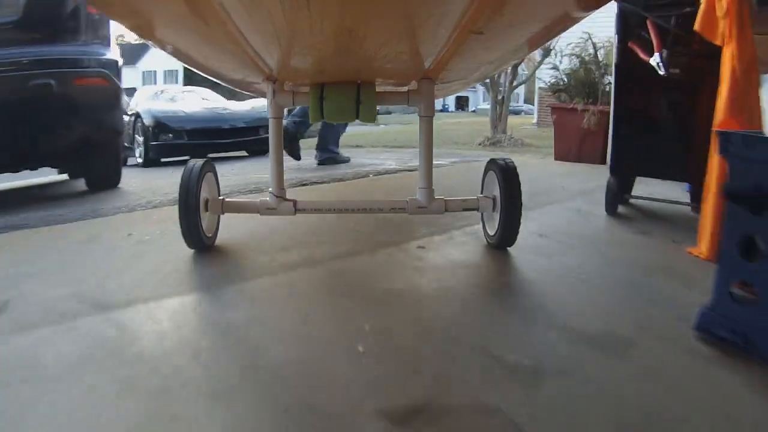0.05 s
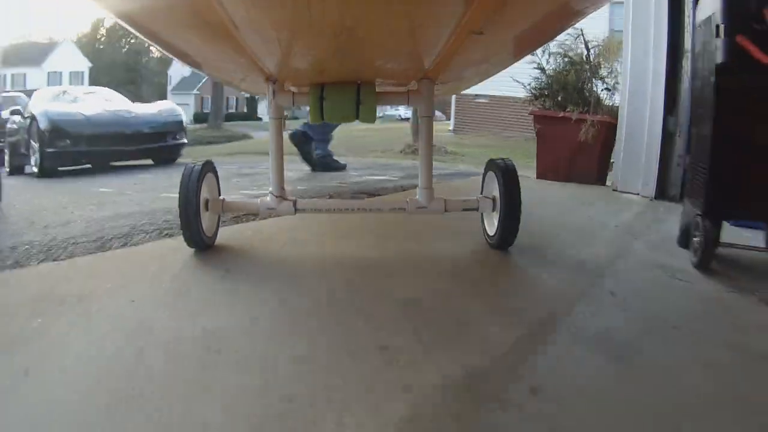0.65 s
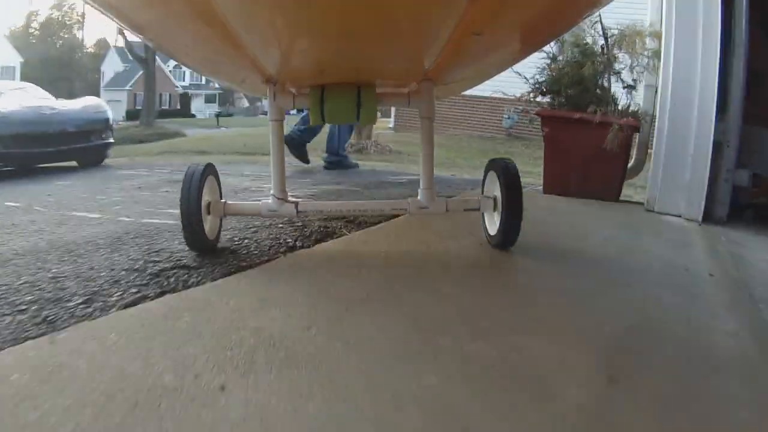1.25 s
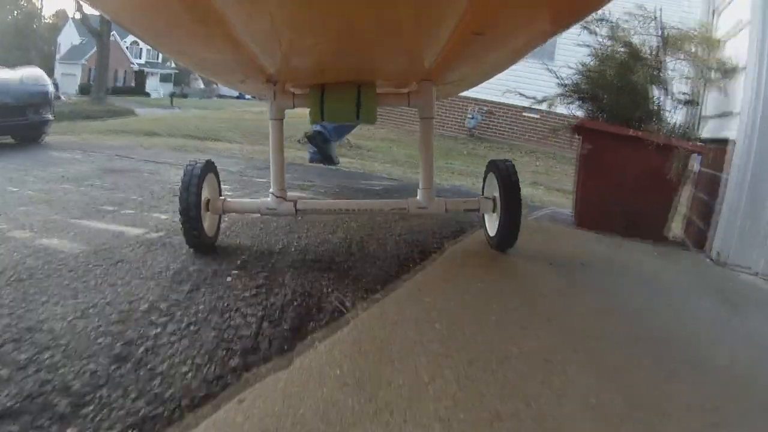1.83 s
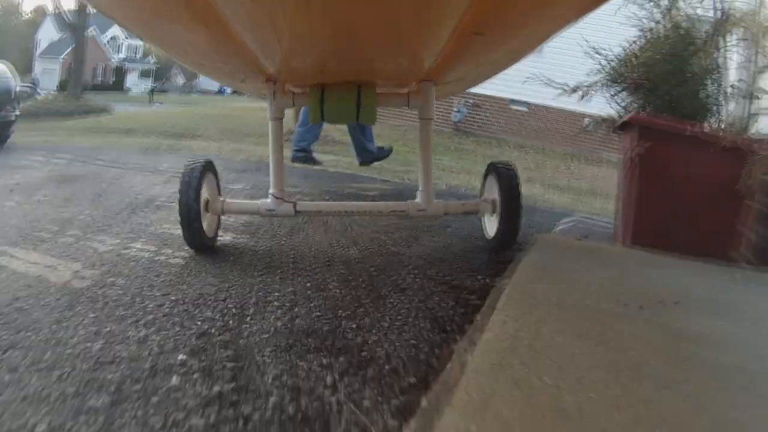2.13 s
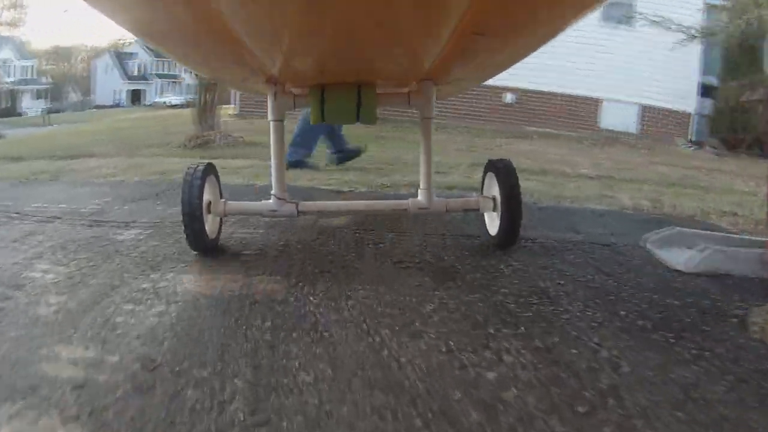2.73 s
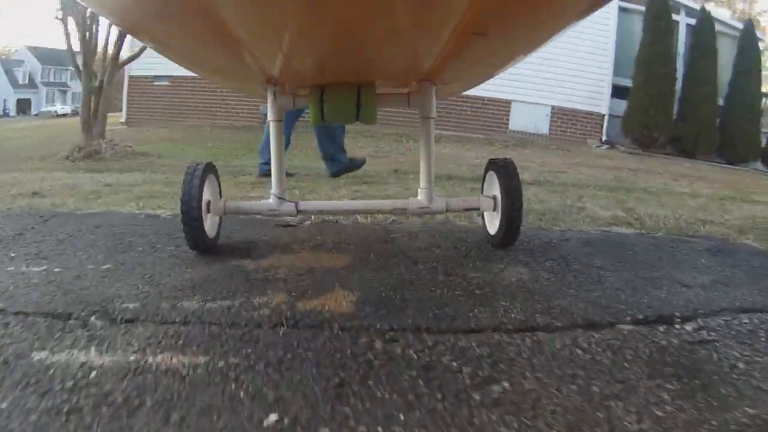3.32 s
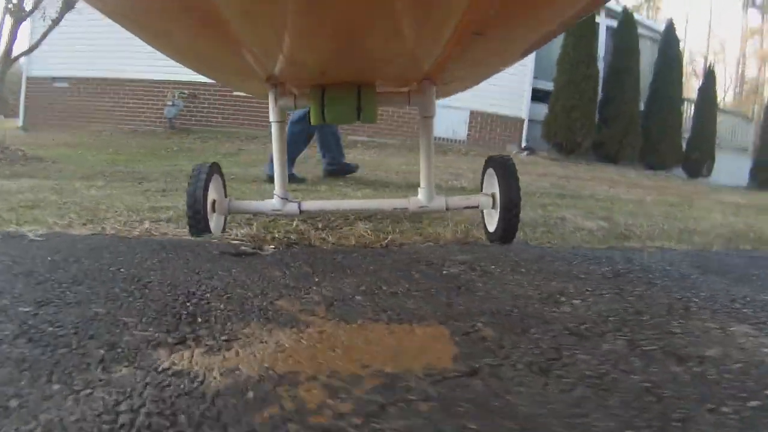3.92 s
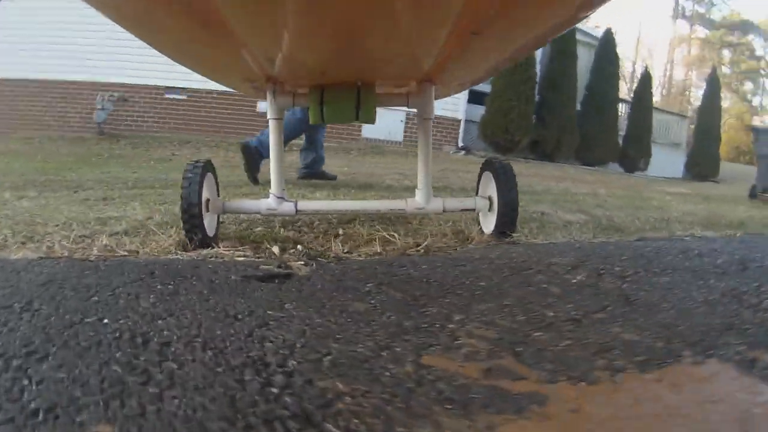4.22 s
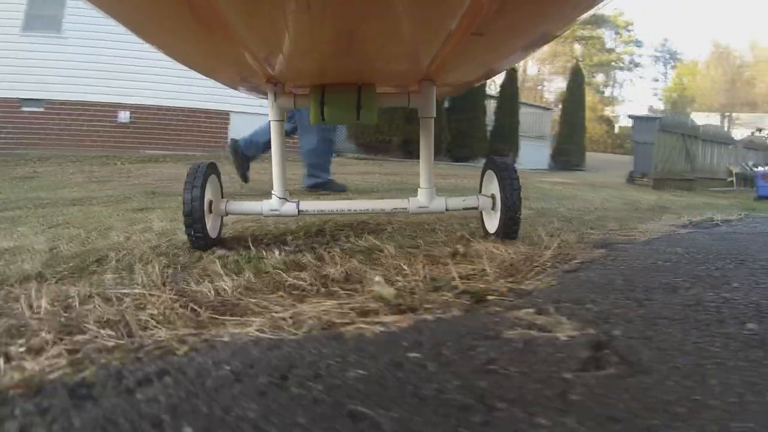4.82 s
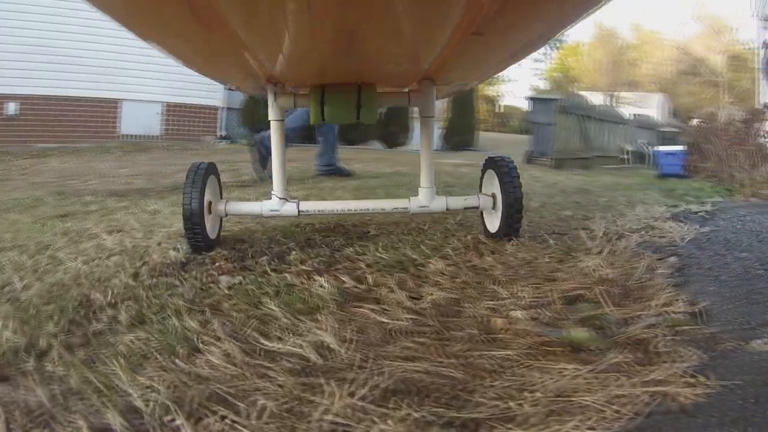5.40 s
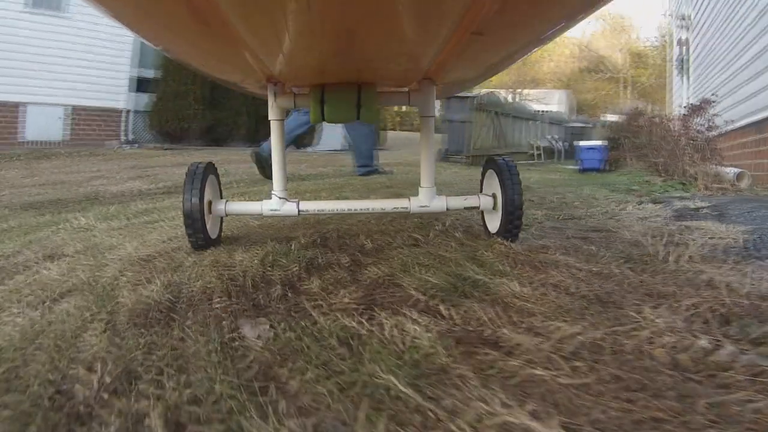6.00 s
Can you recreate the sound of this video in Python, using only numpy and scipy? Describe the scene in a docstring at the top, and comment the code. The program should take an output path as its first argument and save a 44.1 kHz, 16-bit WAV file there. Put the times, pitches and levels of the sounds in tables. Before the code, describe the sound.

A boat hull rides on a pipe cart with hard plastic wheels, heard from directly underneath. Over concrete and asphalt the hollow hull rumbles and booms, grit grinds, and loose hubs clack unevenly. Bumps bring knocks and sharp metal snaps, with the hardest jolts coming about two thirds of the way through. Then the wheels reach grass and the clatter dies into a soft rustle.

```python
"""A boat pulled on a cart

A hollow hull on a pipe-frame cart with hard plastic wheels rolls out of a garage, over asphalt and
onto grass. The ground shakes the hull into a rumble that leaps at each bump. Loose hubs tick and
rebound, the hull knocks, and the worst jolts snap a metal fitting. The microphone rides under the
hull, so the hardest blows overload it. On the grass the rattle dies into a soft rustle."""
import sys
import numpy as np
from scipy import signal
from scipy.fft import rfft, irfft
from scipy.io import wavfile
from scipy.ndimage import uniform_filter1d

SR = 44100
rng = np.random.default_rng(int(sys.argv[2]) if len(sys.argv) > 2 else 0)


def wrap_up_sound(samples):
    """Save the sound to the file named by the first command line argument, as 16-bit audio."""
    columns = np.atleast_2d(samples).T
    # keep every value between -1 and 1, then stretch to whole-number steps
    tamed = np.clip(columns, -1, 1)
    steps = np.round(tamed * 32767).astype(np.int16)
    wavfile.write(sys.argv[1], SR, steps)


N = 271215
BLOW_SIZE = 8192  # samples in one short sound
TIME, AGE = np.arange(N) / SR, np.arange(BLOW_SIZE) / SR  # seconds into the scene, into a short sound
FREQS, BLOW_FREQS = np.fft.rfftfreq(N, 1 / SR), np.fft.rfftfreq(BLOW_SIZE, 1 / SR)


# the cart bouncing on its wheels, and the hull's lowest note: (pitch [Hz], half-width [Hz], level [dB])
CART_BOUNCE = [(35.93, 6.3, -8.5), (23.8, 4.6, -16)]
HULL_DRONE = [(70.2, 7.2, 0)]
# the hull's deep boom and higher drumming; a colour says how strong each pitch is:
# (frequency [Hz], level [dB])
BOOM_COLOUR = [(80, -19.5), (100, 3.5), (120, 6.5), (148, 3), (175, 0.5), (200, -7), (250, -26.5),
               (400, -61), (800, -83.5)]
DRUM_COLOUR = [(120, -21.5), (200, -2.5), (245, 12), (330, 7), (480, 2), (650, -10), (850, -9.5),
               (2000, -69)]

def rumble():
    """The ground bounces the cart and makes the hollow hull drone, boom and drum."""
    uneven, coarse = terrain()
    bounce_db = ride(uneven, -22, follow=0.31, grass_db=-24.5, bump_db=-29.5, bump_t60=0.4, waver_db=1.5)
    drone_db = ride(uneven, -22, follow=1.3, grass_db=-11.5, bump_db=-20, bump_t60=0.68, waver_db=1.64)
    boom_db = ride(uneven, -27, follow=0.6, grass_db=-13, bump_db=-14, bump_t60=0.35, waver_db=-1.24)
    drum_db = ride(coarse, -42.5, follow=0.74, grass_db=-5, bump_db=-18.5, bump_t60=0.24, waver_db=2.1)
    force = tread_force(grains_per_s=300, spread_db=1.5, smooth_db=1.5, smear_t60=0.013)
    bounce = shaken(force, resonances(CART_BOUNCE), bounce_db, steady_s=0.16)
    drone = shaken(force, resonances(HULL_DRONE), drone_db, steady_s=0.22)
    boom = shaken(force, colour_gain(BOOM_COLOUR), boom_db, steady_s=0.11)
    drum = shaken(force, colour_gain(DRUM_COLOUR), drum_db, steady_s=0.11)
    return bounce + drone + boom + drum


# the ground, from garage floor to lawn: (time [s], unevenness [dB], coarseness [dB])
GROUND = [(0, 2, 3.5), (0.32, -3, -4.5), (0.7, 0.5, -4), (0.98, -7.5, -3.5), (1.1, 0, 2.5),
          (1.45, 3.5, 1.5), (2.12, -2.5, -5.5), (2.218, 3, -0.5), (2.701, 1.5, 2.5), (3.21, 3, -8),
          (3.27, 3, -0.5), (3.72, -6, -4.5), (3.92, -4.5, -0.5), (3.99, 1, 5), (4.62, -7, 6.5),
          (4.72, 4.5, -2), (5.05, -9.5, -0.5), (5.55, -9, -6.5), (6.15, -11, -2.5)]
# a wheel drops over an edge or a crack: (time [s], heave of the whole cart [dB], sharp jar [dB])
BUMPS = [(0, -3.5, -12), (1.035, -28, -5.5), (1.069, -1.5, -8.5), (1.209, -4, -13.5), (1.38, -22, -11),
         (2.206, -1.5, -5.5), (2.371, -1.5, -1.5), (2.731, 2, -9.5), (2.953, 0.5, -9), (3.025, -14, -3.5),
         (3.382, -9, -10), (3.953, -4, 3), (4.02, -5, 1), (4.117, -3.5, -4), (4.298, -1, -0.5),
         (4.433, -10, -3.5), (4.505, 1, -7.5), (4.669, -5.5, -11), (4.78, -21.5, -11.5)]

def terrain():
    """Two sides of the same ground: unevenness with its heaves, and coarseness with its jars."""
    times, uneven_db, coarse_db = np.transpose(GROUND)
    heaves = [(when, db) for when, db, _ in BUMPS]
    jars = [(when, db) for when, _, db in BUMPS]
    return (np.interp(TIME, times, uneven_db), heaves), (np.interp(TIME, times, coarse_db), jars)


def ride(surface, level_db, follow, grass_db, bump_db, bump_t60, waver_db):
    """A part's loudness in dB: it follows the ground, wavers, softens on grass and leaps at bumps."""
    ground_db, bumps = surface
    power = amp(level_db + follow * ground_db + waver_db * waver(rate=9) + grass_db * (1 - paving())) ** 2
    leap = np.minimum(AGE / 0.0068, 1) * fade(bump_t60)  # rises in 6.8 ms, then dies away
    for when, db in bumps:
        start = int(when * SR)
        power[start:start + BLOW_SIZE] += (amp(bump_db + db) * leap) ** 2
    return 10 * np.log10(power)


def paving():
    """1 while the wheels are on hard ground, sliding to 0 as they roll onto grass."""
    return np.interp(TIME, [4.42, 5.096], [1, 0])


def tread_force(grains_per_s, spread_db, smooth_db, smear_t60):
    """Stones crunch briefly under the wheels, over an even roughness; grass has no stones."""
    stones = grains(N, grains_per_s, spread_db)
    one_crunch = fade(smear_t60) * (1 - fade(smear_t60))
    crunch = signal.oaconvolve(stones ** 2, one_crunch ** 2)[:N]
    power = paving() * np.abs(crunch) / np.mean(crunch) + amp(smooth_db) ** 2
    return np.sqrt(power) * rng.standard_normal(N)


# notes of the pipe frame and hull: (pitch [Hz], level [dB], time to fade by 60 dB [s])
FRAME_MODES = [(803, 9, 0.083), (921, 0, 0.12), (1020, -37, 0.18), (1168, -14.5, 0.2), (1288.4, 6.5, 0.052),
               (1490, -13.5, .11), (1510, -16, 0.084), (1656, 6.5, 0.047), (3260, -10, 0.21),
               (3770, 1.5, .08)]
# loose hubs hitting the axle: (time [s], level [dB], extra treble [dB])
HUB_TICKS = [(0.0285, -23, 3), (0.0532, -31.5, 5), (0.1051, -27, 4), (0.1372, -28, 6), (0.2426, -28, 1),
             (0.632, -33, -39), (0.7911, -31, -6), (1.1083, -17.5, 1.5), (1.298, -11.5, 7.5),
             (1.4419, -14.5, 10), (1.4553, -20.5, -17), (1.491, -32, 5), (1.529, -25.5, 5),
             (1.757, -29, -6.5), (1.9126, -16.5, 1), (1.9603, -26.5, -15), (2.006, -23.5, -6.5),
             (2.1808, -23.5, -5), (2.251, -20, 5), (2.4442, -13, 14.5), (2.4645, -20.5, 6),
             (2.5333, -24.5, 1), (2.6101, -6, 6.5), (2.6332, -17.5, 4), (2.74, -18, 5), (2.8319, -18, 2),
             (2.856, -24, -4), (2.957, -26, 14.5), (2.9882, -25.5, 5), (3.118, -27, 2), (3.241, -18.5, 5.5),
             (3.3526, -23, 6), (3.4403, -24.5, -11), (3.519, -31, 1), (3.6077, -28, -12),
             (3.6966, -26.5, -4), (3.7801, -25.5, -8.5), (3.8881, -26.5, -2.5), (3.9566, -18, 10.5),
             (4.3149, -12, 9), (4.3565, -24, -4), (4.4018, -21.5, 4), (4.6073, -20.5, -11),
             (4.6193, -22.5, -5), (4.6434, -29.5, -1), (4.7653, -13.5, 2.5), (4.776, -19, 2),
             (4.853, -30, -2), (4.9293, -26, -3.5)]
# the colour of a tick: (frequency [Hz], level [dB])
TICK_COLOUR = [(200, -36.5), (700, -19), (930, -2), (1300, 1), (1800, -2.5), (2100, -15.5), (2800, -16),
               (3250, -14), (4000, -18.5), (4400, -32.5), (5200, -27), (7000, -47.5), (15000, -66.5)]

def hub_ticks():
    """The wheels sit loosely on the axle; each clack runs up the pipe frame."""
    out, tones = np.zeros(N), ringing(FRAME_MODES)
    for when, db, treble_db in HUB_TICKS + rebounds():
        gain_db = colour_db(TICK_COLOUR) + treble_db * above(2600)
        tick = blow(gain_db, tones, travel_s=0.0017, slide_db=-17.5, scatter_db=-5, scatter_t60=0.021,
                    chatter_db=-11.5, chatter_t60=0.072, ring_db=-10)
        add(out, when, amp(db) * tick)
    return out


def rebounds():
    """A hub bounces back once, lightly, 20 to 82 ms after each clack: rows like HUB_TICKS."""
    times, clack_db, _ = np.transpose(HUB_TICKS)
    chance = rng.random((len(HUB_TICKS), 2))
    times = times + 0.02 + 0.062 * chance[:, 0]
    typical_db = np.minimum(clack_db - 7.5, -34)  # the small gap in the hub limits the bounce
    levels = typical_db + 4.5 * (2 * chance[:, 1] - 1)
    return [(when, db, -10) for when, db in zip(times, levels)]


# the hull bumping on its frame: (time [s], level [dB], extra treble [dB], extra bass [dB])
HULL_KNOCKS = [(0.87, -33.5, -6, 12), (1.068, -15.5, 6.5, 12), (1.123, -15, -42, -19), (1.209, -22, 6, 4),
               (1.2854, -26, -11, -17), (1.3854, -23, 18, 28), (1.5368, -15, -43, -33),
               (1.7006, -14.5, -27, -17.5), (1.8372, -17, -39, -19), (2.2103, -15, 7, 4.5),
               (2.2285, -14, -3, 16), (2.2624, -15.5, -46, -1), (2.3745, -14, 0, 2), (2.5779, -18, -19, -3),
               (2.6087, -17, -19, -15), (2.8484, -21.5, -19, 2), (3.033, -31, -24, 26),
               (3.2549, -17, -23, -16), (3.294, -24.5, -5, 9), (3.3869, -18.5, -6, -5),
               (3.8443, -24.5, -22, -2), (3.9671, -16.5, -14, -10), (4.022, -8.5, 14.5, 13.5),
               (4.122, -6, 0, 5), (4.2134, -8.5, -9, -2), (4.296, -22, 2, -3), (4.4398, -7, -4.5, 1),
               (4.4912, -14.5, 10, 21.5)]
# the colour of a knock: (frequency [Hz], level [dB])
KNOCK_COLOUR = [(90, -16.5), (250, -4), (450, -7), (650, -14), (820, -2), (1200, 1), (1500, -12.5),
                (2000, -22.5), (3200, -27.5), (5200, -37.5), (7000, -57.5), (15000, -59.5)]

def hull_knocks():
    """Softer, heavier blows that also push the hull's panels."""
    out, tones = np.zeros(N), ringing(FRAME_MODES)
    for when, db, treble_db, bass_db in HULL_KNOCKS:
        gain_db = colour_db(KNOCK_COLOUR) + treble_db * above(1800) + bass_db * (1 - above(1100))
        knock = blow(gain_db, tones, travel_s=0.003, slide_db=-8.5, scatter_db=-5.5, scatter_t60=0.06,
                     chatter_db=-22, chatter_t60=0.4, ring_db=-8)
        add(out, when, amp(db) * knock)
    return out


# notes of the metal fitting: (pitch [Hz], level [dB], time to fade by 60 dB [s])
FITTING_MODES = [(3850, -10, .17), (3984, -24, .18), (4320, -8, .14), (4720, -7.5, 0.32), (4890, -11, 0.13),
                 (5561, 1, 0.13), (6470, -10, 0.11)]
# its snaps: (time [s], level [dB], extra treble [dB], extra high treble [dB])
FITTING_SNAPS = [(1.081, -15, -7.5, -5), (1.088, -23, 0, 5), (1.2209, -8.5, -5.5, 2),
                 (2.2691, -7.5, 9.5, -21), (2.389, -10.5, 8, -1), (2.4827, -21.5, 0, -7),
                 (4.04, -17.5, -7.5, -11.5), (4.104, -11, 3, 0), (4.2366, -10.5, 11, -4)]
# the colour of a snap: (frequency [Hz], level [dB])
SNAP_COLOUR = [(300, -18.5), (900, -3.5), (1400, 4.5), (2500, -6.5), (3050, -5.5), (3500, -5.5),
               (4300, -7.5), (5400, -12), (6250, -19.5), (6700, -15), (9000, -17), (10500, -21.5),
               (15000, -27)]

def fitting_snaps():
    """A metal fitting snaps against its stop next to the microphone and rings faintly."""
    out, tones = np.zeros(N), ringing(FITTING_MODES)
    for when, db, treble_db, top_db in FITTING_SNAPS:
        gain_db = colour_db(SNAP_COLOUR) + treble_db * above(1900) + top_db * above(8100)
        snap = blow(gain_db, tones, travel_s=0.0011, slide_db=-19.5, scatter_db=-2, scatter_t60=0.0067,
                    chatter_db=-41.5, chatter_t60=0.12, ring_db=-27.5)
        add(out, when, amp(db) * snap)
    return out


def blow(gain_db, tones, travel_s, slide_db, scatter_db, scatter_t60, chatter_db, chatter_t60, ring_db):
    """One hit: a short slide, a wave that bends the part, its echoes, chatter and ringing notes."""
    # each spot that is hit favours other pitches, at random, a third of an octave apart
    bands_hz = 200 * 2 ** (np.arange(20) / 3)
    spot_db = 2 * np.interp(BLOW_FREQS, bands_hz, rng.standard_normal(len(bands_hz)))
    # give this colour a sharp start and a dying tail (minimum phase)
    cepstrum = irfft((gain_db + spot_db) * np.log(10) / 20)
    cepstrum[1:BLOW_SIZE // 2] *= 2
    cepstrum[BLOW_SIZE // 2 + 1:] = 0
    # high pitches travel faster through the part; travel_s is the delay at 1 kHz
    wave = np.exp(rfft(cepstrum) - 4j * np.pi * travel_s * np.sqrt(BLOW_FREQS * 1000))
    # the parts slide just before they strike: the end of the array wraps round to the front
    slide = rng.standard_normal(BLOW_SIZE) * fade(0.023)[::-1]
    scatter = rng.standard_normal(BLOW_SIZE) * fade(scatter_t60) * (1 - fade(0.0078))
    chatter = grains(BLOW_SIZE, per_s=970, spread_db=-3) * fade(chatter_t60) * (1 - fade(0.09))
    # each hit shares its energy differently among the notes
    shares = rng.standard_normal(len(tones)) + 1j * rng.standard_normal(len(tones))
    ring = np.sum(shares[:, None] * tones, axis=0).real
    hit = unit(irfft(wave))
    for db, part in (slide_db, slide), (scatter_db, scatter), (chatter_db, chatter), (ring_db, ring):
        hit += amp(db) * unit(irfft(wave * rfft(part)))
    return short_sound(hit)


# the colours of grinding stones and hissing grit: (frequency [Hz], level [dB])
GRIND_COLOUR = [(400, -7.5), (700, -0.5), (900, 2.5), (1280, 2), (1750, -18), (2100, -24), (3300, -27.5),
                (4000, -33.5), (4600, -42), (9000, -67.5)]
GRIT_COLOUR = [(1500, -27), (3000, -1.5), (4300, -3), (5250, 0), (6200, -7.5), (7200, -10), (9500, -12.5),
               (10800, -11), (12500, -20), (15500, -32)]

def wheel_noise():
    """Stones grind and grit hisses under the hard wheels, and the frame's joints rattle along."""
    _, coarse = terrain()
    grind_db = ride(coarse, -41, follow=1, grass_db=-6, bump_db=-35, bump_t60=0.36, waver_db=1.23)
    hiss_db = ride(coarse, -62.5, follow=0.3, grass_db=-3, bump_db=-57, bump_t60=0.2, waver_db=0.5)
    stones = tread_force(grains_per_s=170, spread_db=3.8, smooth_db=-1, smear_t60=0.02)
    grit = tread_force(grains_per_s=120, spread_db=0, smooth_db=2.5, smear_t60=0.0091)
    grind = shaken(stones, colour_gain(GRIND_COLOUR), grind_db, steady_s=0.099)
    hiss = shaken(grit, colour_gain(GRIT_COLOUR), hiss_db, steady_s=0.21)
    return grind + hiss + loose_joints(grind_db - 7)


# the colour of the rattling joints: (frequency [Hz], level [dB])
JOINT_COLOUR = [(900, -8), (1300, 10), (1750, 2), (2200, -6), (3300, -5), (4000, -12.5), (4500, -12),
                (5400, -12.5), (7000, -25.5), (14000, -43.5)]

def loose_joints(level_db):
    """The pipe joints jiggle in tiny random clicks; on grass these blur into a rustle."""
    clicks = tread_force(grains_per_s=80, spread_db=2.5, smooth_db=-16, smear_t60=0.022)
    return shaken(clicks, colour_gain(JOINT_COLOUR), level_db, steady_s=0.6)


# the wheels skidding sideways: (start [s], end [s], level [dB])
SKIDS = [(0, 0.18, -54), (0.5, 0.634, -57), (0.962, 1.118, -47.5), (2.354, 2.394, -43),
         (4.084, 4.114, -32.5)]
# the colour of a skid: (frequency [Hz], level [dB])
SKID_COLOUR = [(1500, 7), (3400, 10.5), (5500, 8.5), (7000, -2), (10500, -6), (12500, -9), (15500, -24)]

def skids():
    """Hard wheels dragged across the paving swish and stop."""
    pressure = np.zeros(N)
    for start, end, db in SKIDS:
        progress = np.clip((TIME - start) / (end - start), 0, 1)
        pressure += amp(db) * np.sqrt(np.abs(np.sin(np.pi * progress)))
    sand = tread_force(grains_per_s=2400, spread_db=1.5, smooth_db=-18, smear_t60=0.0038)
    return pressure * shaken(sand, colour_gain(SKID_COLOUR), level_db=0, steady_s=0.46)


# squeaks of the rubbing frame: (time [s], level [dB])
SQUEAKS = [(.021, -31.5), (0.097, -35), (0.119, -25), (0.698, -36), (2.213, -35.5), (2.96, -42.5),
           (6.05, -51.5)]
# the colour of a squeak: (frequency [Hz], level [dB])
SQUEAK_COLOUR = [(2500, -11), (4300, -10), (4900, 5.5), (5400, 3.5), (6300, -7.5), (7000, -21),
                 (10000, -22.5), (15000, -46.5)]

def squeaks():
    """A joint slips for a few milliseconds and sings around one high pitch."""
    shape = (1 - fade(0.017)) * (fade(0.0081) + amp(-30) * fade(0.23))
    return bursts(SQUEAKS, SQUEAK_COLOUR, shape)


# dry grass crushed by a wheel: (time [s], level [dB])
GRASS_CRUNCHES = [(4.812, -34), (4.975, -50), (5.005, -41), (5.11, -44), (5.19, -40), (5.585, -50),
                  (5.92, -55), (6.135, -46)]
# the colour of a crunch: (frequency [Hz], level [dB])
CRUNCH_COLOUR = [(1200, 20.5), (2300, 3), (4000, -10), (5500, -12), (7000, -16), (11000, -19), (15000, -45)]

def grass():
    """Tufts give way softly under the wheels."""
    return bursts(GRASS_CRUNCHES, CRUNCH_COLOUR, shape=(1 - fade(0.048)) * fade(0.0773))


def bursts(events, colour, shape):
    """A short rubbing noise for each (time [s], level [dB]) row."""
    out = np.zeros(N)
    for when, db in events:
        noise = shape * rng.standard_normal(BLOW_SIZE)
        rub = irfft(rfft(noise) * colour_gain(colour, BLOW_FREQS))
        add(out, when, amp(db) * short_sound(rub))
    return out


def shaken(force, gain, level_db, steady_s):
    """A force heard through a body, at the given level when averaged over steady_s seconds."""
    x = irfft(rfft(force) * gain, N)
    return x / envelope(x, steady_s) * amp(level_db)


def resonances(modes):
    """How strongly a body answers each frequency: one steep peak for each of its notes."""
    return sum(amp(db) / (1 + 1j * (FREQS - hz) / width) ** 2 for hz, width, db in modes)


def ringing(modes):
    """Each note as a fading complex tone, one a row."""
    return np.array([amp(db) * fade(t60) * np.exp(2j * np.pi * hz * AGE) for hz, db, t60 in modes])


def grains(size, per_s, spread_db):
    """Tiny contacts at random moments; spread_db makes their strengths unequal."""
    touches = rng.random(size) < per_s / SR
    strength = amp(spread_db * np.minimum(rng.exponential(size=size), 4))
    return unit(touches * strength * rng.choice([-1, 1], size) + 1e-12)


def waver(rate):
    """A slow wander of about 1 either way, gliding to a new random value rate times a second."""
    hold = int(SR / rate)
    steps = rng.standard_normal(400)[np.arange(N) // hold]
    return 1.25 * uniform_filter1d(steps, hold)


def colour_db(points, freqs=BLOW_FREQS):
    """Join a colour's points into a curve in dB that falls away below the first one."""
    hz, db = np.transpose(points)
    octave = np.log2(freqs + 1)
    return np.interp(octave, np.log2(hz), db) - 20 * np.maximum(np.log2(hz[0]) - octave, 0)


def colour_gain(points, freqs=FREQS):
    """A colour as a gain for each frequency."""
    return amp(colour_db(points, freqs))


def above(corner_hz):
    """0 well below the corner frequency, 1 well above it."""
    return 1 - 1 / (1 + (BLOW_FREQS / corner_hz) ** 4)


def short_sound(x):
    """Wrap a sound's lead-in round to its front and scale its loudest 4 ms to a level of one."""
    x = np.roll(x, BLOW_SIZE // 8)
    return x / envelope(x, 0.004).max()


def add(out, when, x):
    """Mix a sound in so that its strongest moment falls at the given time."""
    start = int(when * SR) - np.argmax(np.abs(signal.hilbert(x)))
    lo, hi = max(start, 0), min(start + len(x), N)
    out[lo:hi] += x[lo - start:hi - start]


def fade(t60):
    """Die away by 60 dB every t60 seconds."""
    return np.exp(-np.log(1000) * AGE / t60)


def envelope(x, seconds):
    """The running average level (rms)."""
    return np.sqrt(np.abs(uniform_filter1d(x ** 2, int(seconds * SR))) + 1e-18)


def unit(x):
    """Scale to an energy of one."""
    return x / np.sqrt(np.sum(x ** 2))


def amp(db):
    """Turn decibels into a gain."""
    return 10 ** (np.asarray(db) / 20)


def scene():
    """Everything reaches the one microphone under the hull."""
    rolling = rumble() + wheel_noise() + skids() + grass()
    return (rolling + hub_ticks() + hull_knocks() + fitting_snaps() + squeaks())[None]


def record(dry):
    """The hardest blows overload the microphone and clip; treble above 15.8 kHz is cut."""
    treble_cut = signal.ellip(8, 0.2, 70, 15800, fs=SR, output="sos")
    return signal.sosfilt(treble_cut, np.clip(dry, -1, 1))


dry = scene()
out = record(dry)
wrap_up_sound(out)
```